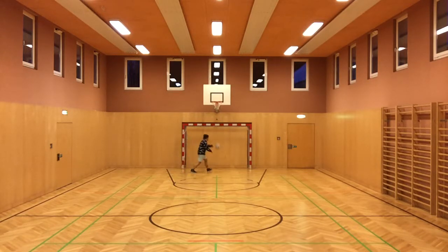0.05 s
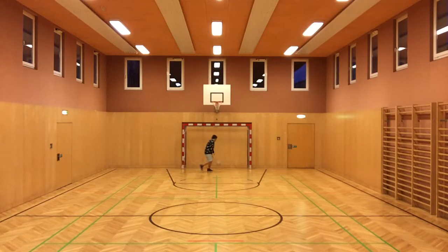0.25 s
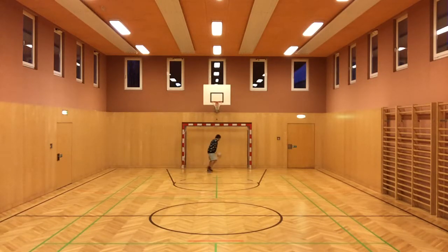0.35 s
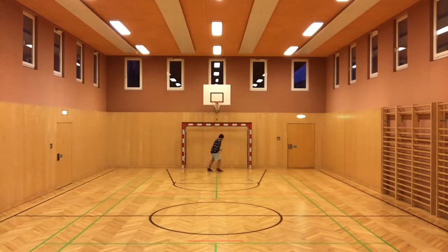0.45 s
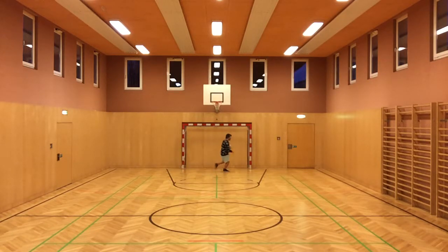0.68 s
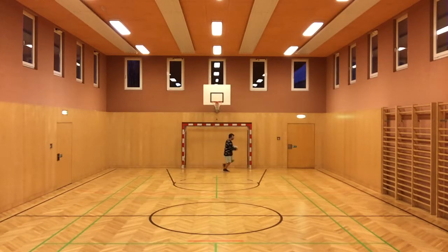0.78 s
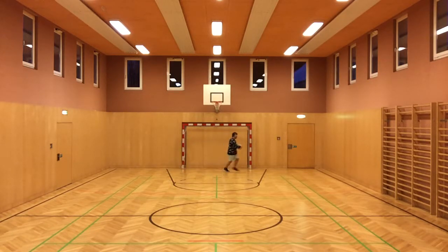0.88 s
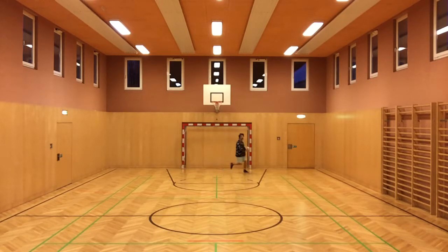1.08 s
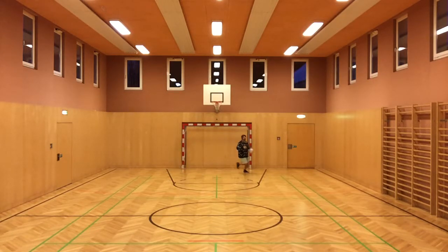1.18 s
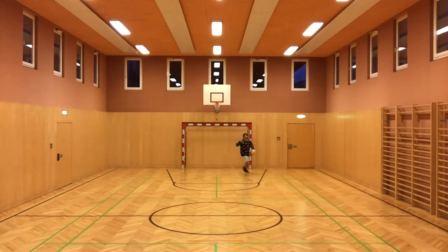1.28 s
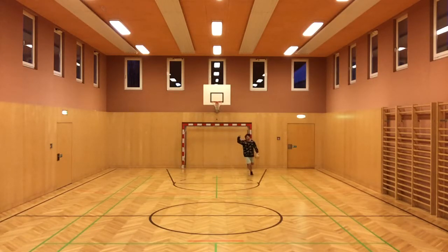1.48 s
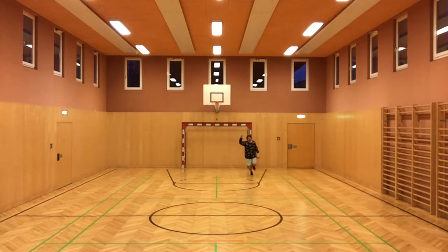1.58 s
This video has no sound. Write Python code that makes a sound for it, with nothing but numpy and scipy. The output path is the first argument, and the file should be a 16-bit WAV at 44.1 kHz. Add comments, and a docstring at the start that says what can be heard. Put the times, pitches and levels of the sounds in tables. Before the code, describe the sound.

A kicked ball slaps a wall and bounces, echoing in a large sports hall.

```python
"""The thud of a kicked ball, then its slap on the panelled end wall of a large sports hall.
The wall booms and the ball drops back on the sprung floor; the player's shoes land softly.
At each contact the casing snaps and the air inside rings. The microphone gets the direct sound,
a few hard reflections, a flutter between the end walls and a long, darkening reverberation,
all over the low rumble of the ventilation."""
import sys
import numpy as np
from scipy import signal
from scipy.fft import rfft, irfft, next_fast_len
from scipy.io import wavfile

SR = 44100
rng = np.random.default_rng(int(sys.argv[2]) if len(sys.argv) > 2 else 0)


def store_wav(level_fs):
    """Save 16-bit WAV to argv[1]."""
    pcm = np.round(np.clip(np.atleast_2d(level_fs), -1, 1) * 32767)
    wavfile.write(sys.argv[1], SR, pcm.T.astype(np.int16))


N = 72765
T = np.arange(N) / SR


def from_db(db):
    """Decibels to gain."""
    return 10 ** (np.asarray(db) / 20)


def at_hz(points, hz):
    """Read a table on a log-frequency axis."""
    table_hz, values = np.transpose(points)
    return np.interp(np.log(np.maximum(hz, 1)), np.log(table_hz), values)


def coloured(x, colour, tilt_db_per_octave=0):
    """Causal (minimum-phase) filter with the given spectrum, tilted about 1 kHz."""
    size = 2 * next_fast_len(N)
    hz = np.arange(size // 2 + 1) * SR / size
    octaves = np.log2(np.maximum(hz, 100) / 1000)
    cepstrum = irfft(np.log(from_db(at_hz(colour, hz) + tilt_db_per_octave * octaves)))
    cepstrum[1:size // 2] *= 2
    cepstrum[size // 2 + 1:] = 0
    return irfft(rfft(x, size) * np.exp(rfft(cepstrum)))[:N]


def delayed(x, delay_s):
    """Start a sound later."""
    return np.concatenate([np.zeros(int(delay_s * SR)), x])[:N]


def dying(t60_s):
    """Exponential decay, 60 dB down after t60_s."""
    return np.exp(-np.log(1000) * T / t60_s)


def ventilation():
    """Room tone: the ventilation's steady low rumble and faint hiss."""
    # Spectrum of the moving air: frequency_hz, gain_db
    air_colour = [(25, -16.5), (50, -10.5), (73, 13), (105, 1), (200, -10.5), (500, -24), (1200, -25.5),
                  (2500, -33.5), (5000, -41), (15000, -51)]
    white = rfft(rng.standard_normal(N))
    hz = np.arange(len(white)) * SR / N
    return irfft(white * from_db(at_hz(air_colour, hz) - 31.5), N)


def diffuse_field():
    """Dense reflections from all round the hall: each third-octave band dies at its own rate."""
    # The hall's reverberation time: frequency_hz, t60_s
    hall_t60 = [(60, 2.7), (200, 1.35), (450, 1.98), (700, 1.71), (1000, 1.78), (1500, 1.37), (2300, 1.51),
                (3700, 1.33), (4800, 0.85), (6300, 0.9), (8500, 0.55), (15000, .38)]
    white = rfft(rng.standard_normal(N))
    hz = np.arange(len(white)) * SR / N
    third_octaves = 3 * np.log2(np.clip(hz, 80, 16000) / 80)
    sound = np.zeros(N)
    for k in range(24):
        band = irfft(white * np.maximum(1 - abs(third_octaves - k), 0), N)
        sound += band * dying(at_hz(hall_t60, 80 * 2 ** (k / 3)))
    return sound


def hall(build_s, flutter_db):
    """The hall's answer: an early cluster, a long tail and a flutter between the end walls."""
    round_trip_s, rise_s, fade_s = 0.109, 0.0035, 0.011
    since_s = T % round_trip_s
    echoes = 2 * (T > round_trip_s) * (1 - np.exp(-since_s / rise_s)) * np.exp(-since_s / fade_s)
    early, late = from_db(-2) * dying(t60_s=0.42), from_db(-6.5)
    envelope = np.sqrt(early ** 2 + late ** 2 + (from_db(flutter_db) * echoes) ** 2)
    return diffuse_field() * envelope * (1 - np.exp(-(T / build_s) ** 2))


def shoes():
    """Soft footfalls: the sole scuffs as it rolls down from the heel, and the hall answers."""
    # Footfalls: start_s, level_db, tilt_db_per_octave
    steps = [(0.191, -42.5, 1.5), (1.128, -31.5, 0.5), (1.531, -38.5, -2.5)]
    # Spectrum of a sole on the floor: frequency_hz, gain_db
    shoe_colour = [(35, -4.5), (90, -4.5), (200, -11.5), (520, 1.5), (850, -4.5), (1300, -5.5),
                   (2100, -4.5), (3000, -15), (4500, -22.5), (7000, -29.5), (15000, -65)]
    roll_s = 0.019
    roll = T / roll_s * np.exp(1 - T / roll_s)
    sound = np.zeros(N)
    for start_s, level_db, tilt in steps:
        step = roll * rng.standard_normal(N) + hall(build_s=roll_s, flutter_db=-13)
        sound += from_db(level_db) * delayed(coloured(step, shoe_colour, tilt), start_s)
    return sound


def booms():
    """Floor and panels swell into their low modes; the boom returns from the far walls and lingers."""
    # Heavy blows on the sprung floor and the panelling: start_s, level_db, pitch_ratio
    blows = [(0.208, -38.5, 0.687), (0.269, -30, 1.06), (.372, -16, 1), (.905, -33, 1.5),
             (1.059, -36.5, 1.4), (1.24, -37, 1.17)]
    # Their modes at a pitch ratio of 1: pitch_hz, level_db, t60_s
    panel_modes = [(47, -8.5, 0.15), (57.5, -6, 0.53), (75.44, 2.5, 0.48), (89.63, -5.5, 0.51),
                   (123.3, -19, 0.42)]
    # The boom's arrivals at the microphone: delay_s, level_db
    arrivals = [(0, -2), (0.134, -6.5), (.215, -19.5), (.315, -10)]
    # Spectrum of the lingering rumble: frequency_hz, gain_db
    tail_colour = [(25, -22), (42, -13), (78, -0.5), (120, -1), (180, -16), (400, -68.5)]
    swell_s = 0.021
    swell = 1 - np.exp(-(T / swell_s) ** 2)
    sound = np.zeros(N)
    for start_s, blow_db, pitch_ratio in blows:
        ring = swell * sum(from_db(db) * np.sin(2 * np.pi * pitch_ratio * hz * T) * dying(t60_s)
                           for hz, db, t60_s in panel_modes)
        heard = sum(from_db(db) * delayed(ring, delay_s) for delay_s, db in arrivals)
        tail = from_db(9) * coloured(swell * dying(t60_s=2.0) * rng.standard_normal(N), tail_colour)
        sound += from_db(blow_db) * delayed(heard + tail, start_s)
    return sound


def casing_slap(smear):
    """The casing snaps flat and shudders; smear is the share of the snap spread over milliseconds."""
    smear = np.clip(smear, 0, 1)
    shudder = from_db(-21) * rng.standard_normal(N) * dying(t60_s=0.016)
    grit = rng.standard_normal(N) * dying(t60_s=0.011)
    sound = shudder + np.sqrt(smear / np.sum(grit ** 2)) * grit
    sound[0] += np.sqrt(1 - smear)
    recoil = -0.7   # all-pass: the snap swings one way, then back
    return signal.lfilter([recoil, 1], [1, recoil], sound + 1e-18)


def ball_ring(slap):
    """The slap, with the short ring of the air inside the ball added."""
    # Modes of the enclosed air: pitch_hz, level_db (relative to the slap)
    air_modes = [(357, -3.5), (413, -2.5), (560, -2), (710, -37), (870, -5), (1050, -2), (1194, -16),
                 (1456, -7), (1658, -1.5), (2335, 0.5), (2722, -15), (3270, -19), (3690, 1)]
    width_hz = 13
    radius = np.exp(-np.pi * width_hz / SR)
    gain = (1 - radius ** 2) / 2
    ring = np.zeros(N)
    for hz, db in air_modes:
        feedback = [1, -2 * radius * np.cos(2 * np.pi * hz / SR), radius ** 2]
        ring += from_db(db) * signal.lfilter([gain, 0, -gain], feedback, slap)
    return slap + ring


def ball_contact(colour, paths, smear, hall_db, hall_tilt, flutter_db):
    """One sharp contact, reaching the microphone by its hard paths and through the hall."""
    hard = np.zeros(N)
    for delay_s, path_db in paths:   # longer paths arrive more smeared and duller
        slap = casing_slap(smear + 8.3 * delay_s)
        dulled = coloured(slap, colour, tilt_db_per_octave=-13 * delay_s)
        hard += from_db(path_db) * delayed(dulled, delay_s)
    reverberation = coloured(hall(build_s=0.0061, flutter_db=flutter_db), colour, hall_tilt)
    return ball_ring(hard + from_db(hall_db) * reverberation)


def kick():
    """The shoe drives into the ball with a dull thud."""
    # Spectrum of shoe on ball: frequency_hz, gain_db
    colour = [(35, 9), (80, 2), (150, -7), (300, 7), (550, 3.5), (850, -1.5), (1900, 2), (2700, -11),
              (4500, -21.5), (8000, -34.5), (15000, -72)]
    # Direct sound and first reflections from the player's spot: delay_s, level_db
    paths = [(0, 14.5), (.008, 18), (0.016, 17), (0.02, 16.5)]
    return ball_contact(colour, paths, smear=0.5, hall_db=-1.5, hall_tilt=-0.14, flutter_db=-4.5)


def floor_bounce():
    """The ball drops on the sprung floor with a softer, smeared smack."""
    # Spectrum of ball on floor: frequency_hz, gain_db
    colour = [(35, -4), (70, 2.5), (125, 3.5), (200, 3), (300, -1.5), (500, -0.5), (750, -7), (1500, -6),
              (2300, 1.5), (2900, -3.5), (3800, -4.5), (4800, -14.5), (9000, -23), (15000, -37)]
    # Direct sound and first reflections from the landing spot: delay_s, level_db
    paths = [(0, 16), (.0095, 17), (0.0171, 17), (0.028, 13.4), (.0325, 20.9)]
    return ball_contact(colour, paths, smear=0.81, hall_db=1.0, hall_tilt=-0.69, flutter_db=-3)


def wall_hit():
    """The ball flattens against the end wall with a hard, bright slap."""
    # Spectrum of ball on panelling: frequency_hz, gain_db
    colour = [(35, 10.5), (150, -3), (350, 1.5), (700, -1), (1100, 1.5), (2000, -1.5), (3600, -6),
              (4800, -13), (9000, -21), (15000, -39.5)]
    # Direct sound and first reflections from the end wall: delay_s, level_db
    paths = [(0, 22.7), (.005, 18), (.008, 14), (.0122, 15), (0.0185, 14), (0.028, 7.7), (.0305, 12)]
    return ball_contact(colour, paths, smear=0.031, hall_db=-1.5, hall_tilt=0.093, flutter_db=-2.5)


def scene():
    """Kick, wall and bounce at one microphone, with the steps, the booms and the room tone."""
    ball = from_db(-22) * delayed(kick(), delay_s=0.2158)
    ball += from_db(-14.5) * delayed(wall_hit(), delay_s=0.3406)
    ball += from_db(-24.5) * delayed(floor_bounce(), delay_s=0.9105)
    return (ball + shoes() + booms() + ventilation())[None]


def record(dry):
    """The microphone drops the deepest bass and rounds the highest peaks; the top is cut steeply."""
    low_cut_hz, high_cut_hz, peak_limit = 22.7, 15900, 0.45
    sound = signal.sosfilt(signal.butter(4, low_cut_hz, "high", fs=SR, output="sos"), dry)
    sound = sound / (1 + (sound / peak_limit) ** 4) ** 0.25
    return signal.sosfilt(signal.ellip(10, 0.1, 80, high_cut_hz, fs=SR, output="sos"), sound)


dry = scene()
out = record(dry)
store_wav(out)
```